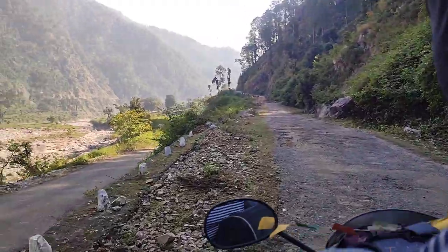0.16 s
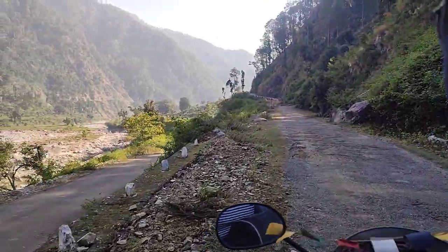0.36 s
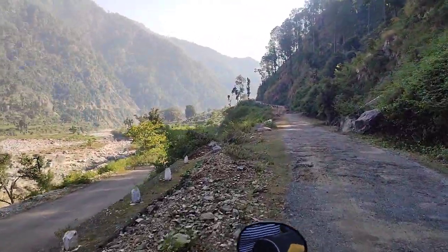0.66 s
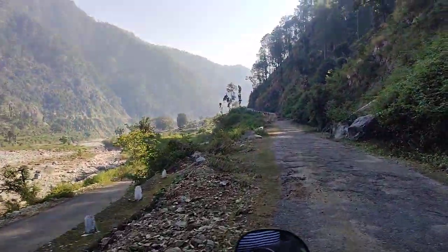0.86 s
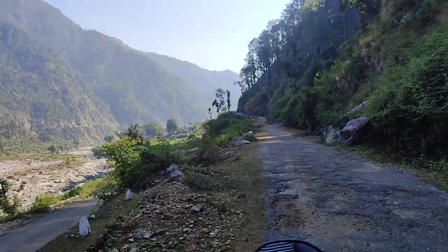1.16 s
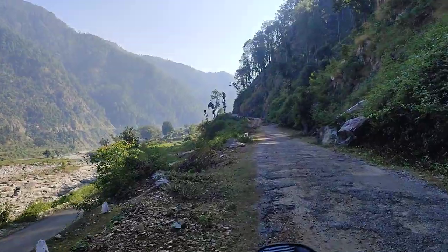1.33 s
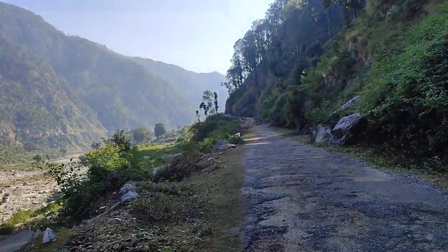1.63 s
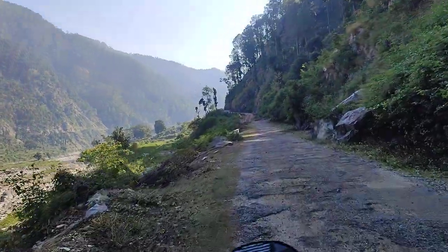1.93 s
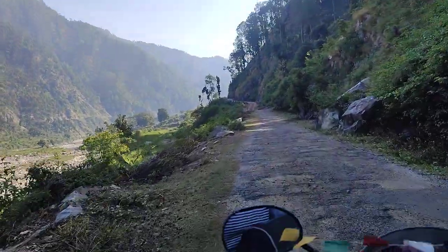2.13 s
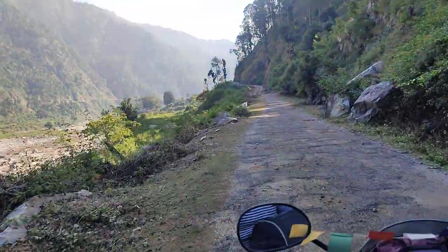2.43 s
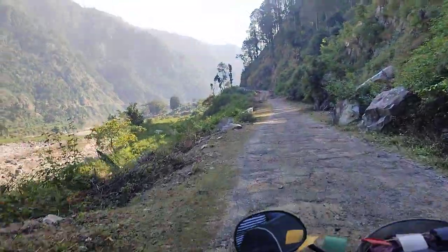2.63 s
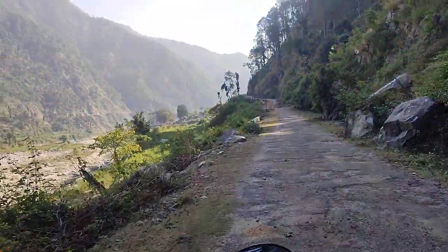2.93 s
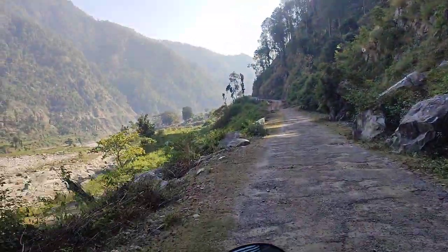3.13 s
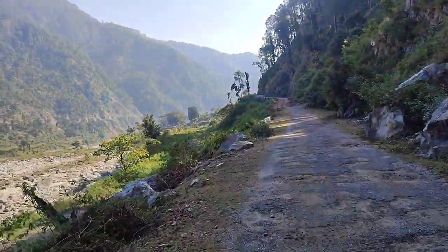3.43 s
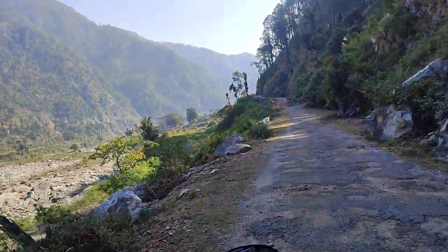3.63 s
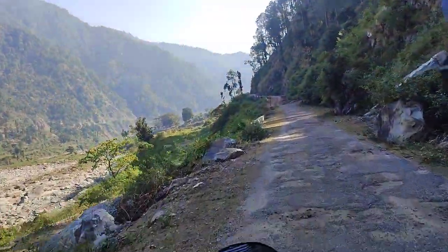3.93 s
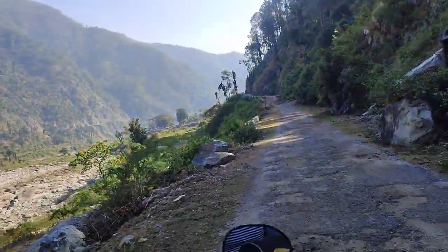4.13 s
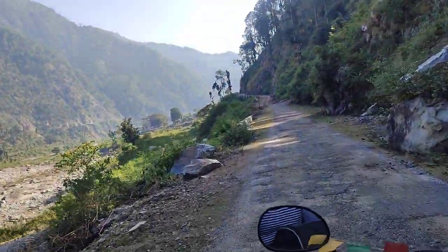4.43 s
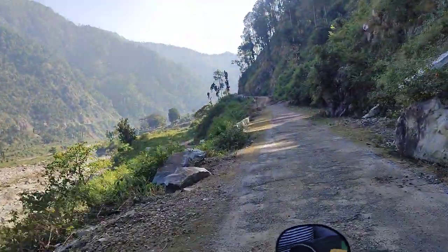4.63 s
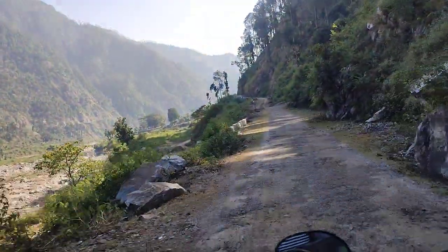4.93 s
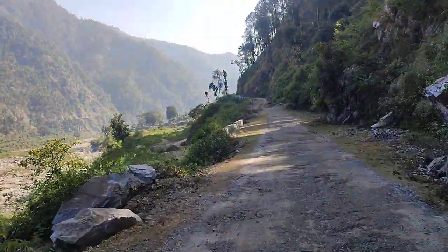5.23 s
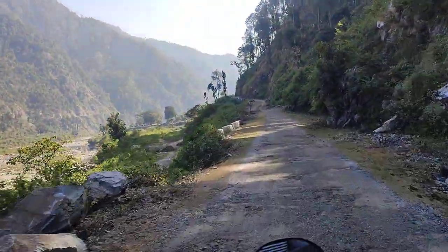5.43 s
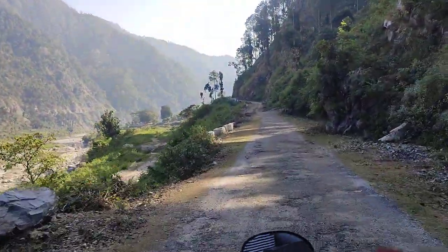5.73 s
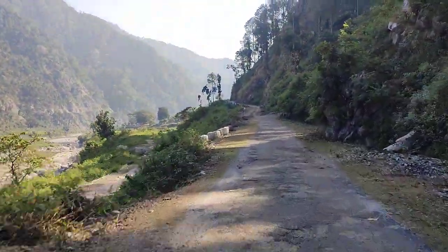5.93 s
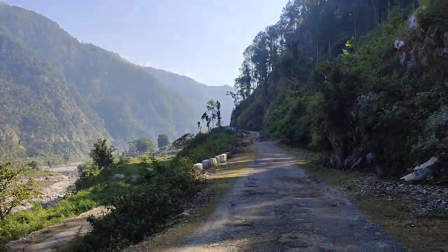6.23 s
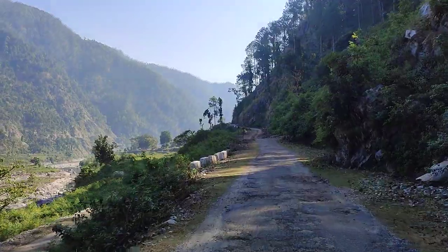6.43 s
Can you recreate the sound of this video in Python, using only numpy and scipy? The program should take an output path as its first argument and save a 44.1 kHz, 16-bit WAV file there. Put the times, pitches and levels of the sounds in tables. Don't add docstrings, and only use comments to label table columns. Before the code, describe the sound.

Wind thumps and flutters over a handheld microphone on a moving motorcycle. Beneath it a single-cylinder engine throbs and clatters, drops to a slow idle after a second, picks up again and climbs steadily, then eases off. Faint loose metal ticks on bumps and a thin hiss of tyres and air sit behind. Gusts start mostly on the left and later batter both sides.

```python
import sys
import numpy as np
from scipy import signal
from scipy.fft import rfft, irfft
from scipy.io import wavfile
from scipy.ndimage import uniform_filter1d, minimum_filter1d

SR = 44100
rng = np.random.default_rng(int(sys.argv[2]) if len(sys.argv) > 2 else 0)


def wav_record(signal):
    frames = np.transpose(np.atleast_2d(signal))
    bounded = np.clip(frames, -1, 1)
    quanta = np.round(bounded * 32767).astype(np.int16)
    wavfile.write(sys.argv[1], SR, quanta)


def field_ratio(decibels):
    return 10 ** (np.asarray(decibels, dtype=float) / 20)


N = 290530

# time_s, firings_per_s
ENGINE_SPEED = [(0, 34.5), (.15, 34.7), (.3, 35.4), (.47, 35.4), (.6, 35.9), (.72, 36.4), (.82, 36.0),
                (1.25, 23.0), (1.45, 17.2), (1.68, 17.0), (1.8, 21.0), (1.9, 25.5), (1.98, 29.6),
                (2.06, 30.1), (2.15, 29.2), (2.25, 28.2), (2.4, 27.75), (2.7, 27.6), (2.85, 27.0),
                (3.0, 26.4), (3.3, 27.7), (3.6, 29.5), (4.05, 31.3), (4.5, 33.4), (4.95, 36.0),
                (5.25, 36.8), (5.6, 38.9), (5.75, 39.0), (6.6, 33.0)]
# time_s, crank_boom_db, exhaust_bark_db
THROTTLE = [(0, -21, -31), (.55, -21, -31), (.72, -28, -32), (.82, -42, -40), (1.3, -48, -45),
            (1.68, -48, -41), (1.9, -36, -35), (2.0, -28, -31), (2.75, -27, -31), (3.0, -30, -33),
            (4.0, -24, -32), (5.4, -23, -30), (5.7, -29, -31), (5.85, -40, -40), (6.6, -46, -44)]
# pitch_hz, width_hz, level_db
EXHAUST_PIPE = [(140, 60, -4), (210, 50, -2), (283, 45, 1), (418, 50, 2), (590, 50, -16)]
# multiple_of_firing_rate, level_over_boom_db
CRANK_TONES = [(1, -21), (2, 0), (3, -20.5)]
# pitch_hz, width_hz, level_db
ENGINE_CASING = [(870, 80, -2), (1170, 110, 1), (1560, 220, 0), (2170, 100, 0), (3400, 160, -1),
                 (3800, 130, -2), (4450, 120, -3)]
# pitch_hz, level_db (per Hz)
CLATTER_COLOUR = [(420, -19), (620, 7.5), (1000, 2), (1650, -1.5), (1850, -5.5), (3000, -7), (4000, -40),
                  (5500, -31)]
# start_s, end_s, multiple_of_firing_rate, level_db, left_over_right_db
PANEL_BUZZES = [
    (-.2, .85, 44, -53, -2),
    (-.2, .8, 24.5, -45, 4),
    (1.95, 2.8, 28, -43, 4),
    (.15, .4, 65.5, -55, 2),
]
# time_s, rumble_db, flutter_db, rasp_db
WIND_LEFT = [(0.0, -44, -28.5, -34.5), (0.18, -24.5, -32.5, -40), (0.36, -12, -30, -35),
             (0.54, -22.5, -36, -41), (0.72, -18.5, -24.5, -30), (0.9, -20.5, -25.5, -38.5),
             (1.08, -22, -21, -32), (1.26, -31, -34, -41), (1.44, -27, -23.5, -43), (1.62, -11.5, -26, -47),
             (1.8, -14, -38, -39), (1.98, -18, -29, -39), (2.16, -18, -28.5, -35), (2.34, -21.5, -31, -43),
             (2.52, -25, -30.5, -40), (2.7, -13.5, -24.5, -36.5), (2.88, -24, -18.5, -30.5),
             (3.06, -17, -21.5, -36), (3.24, -14, -23, -33.5), (3.42, -18, -25, -30.5),
             (3.6, -31, -25, -46), (3.78, -10, -35, -42), (3.96, -21.5, -12, -22), (4.14, -11.5, -35, -47),
             (4.32, -14.5, -16.5, -26), (4.5, -12, -30, -34.5), (4.68, -9.5, -17, -24),
             (4.86, -29, -19, -20.5), (5.04, -50, -31, -24), (5.22, -15.5, -26.5, -19.5),
             (5.4, -19.5, -13, -21), (5.58, -17, -17, -20.5), (5.76, -16, -16, -25.5),
             (5.94, -30, -20, -18), (6.12, -19.5, -35, -23), (6.3, -35, -25.5, -23),
             (6.48, -23.5, -22.5, -23)]
WIND_RIGHT = [(0, -31, -37, -50), (.1, -30, -36, -50), (.3, -27, -35, -50), (.45, -31, -41, -52),
              (.72, -34, -41, -52), (.9, -31, -40, -48), (1.08, -24, -30, -48), (1.26, -32, -39, -50),
              (1.44, -33, -43, -52), (1.62, -43, -47, -54), (1.8, -36, -44, -54), (1.98, -37, -43, -52),
              (2.4, -35, -43, -52), (2.75, -34, -42, -52), (2.88, -33, -33, -48), (3.06, -23, -29, -46),
              (3.24, -21, -32, -46), (3.42, -32, -29, -44), (3.6, -22, -28, -40), (3.78, -15, -30, -44),
              (3.96, -24, -31, -42), (4.14, -24, -26, -42), (4.32, -20, -23, -31), (4.5, -19, -21, -31),
              (4.68, -20, -25, -38), (4.86, -25, -36, -38), (5.04, -13, -19, -33), (5.22, -21, -30, -37),
              (5.4, -22, -24, -38), (5.58, -19, -22, -38), (5.76, -26, -27, -40), (5.94, -18, -29, -39),
              (6.12, -17, -19, -24), (6.3, -17, -17, -16), (6.48, -24, -27, -39)]
# time_s, flutter_db, rasp_over_flutter_db, length_ms
BURSTS_LEFT = [(0.305, -17.5, -16, 17), (0.344, -19.5, -24, 68), (0.508, -12.5, -17, 30),
               (0.558, 1, -36, 5.3), (0.667, -9.5, -33, 16), (0.693, -8, -21, 9.7), (0.792, -6.5, -20, 14),
               (0.887, -8.5, -14.5, 8.3), (0.982, -12, -22, 26), (1.042, -16, -14, 66),
               (1.323, -22, -20, 140), (1.403, -16, -35, 10), (1.463, -15, -29, 10),
               (1.521, -16.5, -31, 16), (1.657, -40, -32, 19), (1.705, -36, -30, 16), (1.804, -18, -20, 16),
               (1.927, -19.5, -30, 72), (2.1, -26.5, -12, 35), (2.296, -21.5, -14, 50), (2.56, -18, -5, 7),
               (2.748, -13, -20, 25), (2.981, -12.5, -17, 36), (3.211, -15.5, -26, 17),
               (3.327, -13, -19, 38), (3.403, -4, -15.5, 8.6), (3.5, -14.5, -10.5, 91),
               (3.576, -3.5, -17, 6.5), (3.603, -1, -23, 5.7), (3.713, -19, -22, 14),
               (3.776, -16, -19, 5.3), (3.859, -11, -17, 11), (4.063, -13.5, -14.5, 33),
               (4.119, -7, -6.5, 5.5), (4.17, -10.5, -14.5, 47), (4.212, -12, -11, 17),
               (4.34, -13.5, -12.5, 33), (4.379, -12.5, -28, 15), (4.5, -13, -11.5, 55),
               (4.714, -17, -21, 26), (4.856, -4, -13, 17), (4.889, -32, -5, 24), (4.987, -17, -8, 24),
               (5.134, -11, -29, 26), (5.249, -15, -3, 9.2), (5.275, -13, -23, 18), (5.369, -14, -6, 15),
               (5.433, -14, -22, 15), (5.594, -15, -10, 56), (5.629, 9.5, -18.5, 8.2), (5.73, -9, -14, 10),
               (5.757, -15, -2.5, 14), (5.8, -20.5, 0, 68), (5.934, -8, -26, 11.7), (6.099, -20.5, -2, 22),
               (6.232, -16.5, -20, 28)]
BURSTS_RIGHT = [(0.292, -23, -22, 22), (1.004, -25, -21, 24), (1.086, -35, -16, 28), (1.16, -20, -20, 22),
                (2.894, -34, -6, 48), (3.032, -26, -26, 35), (3.186, -15.5, -25, 15), (3.268, -27, -11, 19),
                (3.305, -37, -16, 16), (3.52, -35, -12, 18), (3.555, -25, -13, 19), (3.657, -23, -13, 16),
                (3.72, -16, -15, 15), (3.753, -10, -14, 13.6), (3.794, -20.5, -13, 19),
                (3.884, -19, -16, 11), (3.97, -22, -2, 19), (4.113, -24, -7, 15), (4.147, -24, -8, 16),
                (4.195, -18, -17, 17), (4.259, -17.5, -16, 50), (4.347, -25, -3, 17), (4.432, -20, -6, 14),
                (4.477, -18.5, -13, 22), (4.564, -26, -3, 15), (4.676, -27, -3, 40), (4.905, -20, -18, 11),
                (4.986, -18, -31, 13), (5.015, -8.5, -26, 18), (5.052, -11.5, -16, 13),
                (5.104, -9, -14, 9.3), (5.136, -7.5, -25, 13), (5.17, -32, -18, 10.6),
                (5.233, -12.5, -20, 28), (5.282, -16, -27, 24), (5.324, -22, -19, 11),
                (5.392, -38, -22, 25), (5.45, -23, -9, 20), (5.5, -33, -9, 20), (5.534, -20, -9, 13),
                (5.679, -11, -21, 17), (5.77, -19, -12, 49), (5.877, -44, -19, 16), (5.92, -29, -23, 18),
                (6.002, -8, -23, 5), (6.035, -10, -11.5, 60), (6.1, -11.5, -9.5, 28), (6.195, -16, -3, 34),
                (6.28, -10.5, -15, 40), (6.409, -23, -5, 21), (6.448, -12.5, -7, 23), (6.549, -8, -8, 32)]
# time_s, peak_db, crackle_over_peak_db
WHIRLS_LEFT = [
    (0.667, -11, -30),
    (4.76, -9.5, -33),
    (4.815, -4, -28),
    (5.729, -13, -28),
]
WHIRLS_RIGHT = [
    (3.719, -10, -29),
    (4.474, -17, -27),
    (6.005, -13, -35),
    (6.193, -13, -17),
    (6.217, -6, -9),
    (6.411, -7, -19),
    (6.55, -7, -7),
]
# time_s, peak_db, left_over_right_db
METAL_TICKS = [
    (1.6182, -47.5, -14),
    (3.258, -37.5, 5),
    (3.4894, -46, 15),
    (3.69, -36, 2.0),
    (3.914, -45, 5),
    (5.4085, -37.5, -6),
    (5.6017, -43, 16),
]
# pitch_hz, level_db, ring_time_s (to fall 60 dB)
METAL_RING = [(3750, -3, 0.062), (5800, -6, 0.024), (6830, 0.5, 0.032), (7880, 0, 0.015),
              (8400, -1.5, 0.087), (11500, -20, .03), (13900, -32, 0.033)]
# time_s, left_hiss_db, right_hiss_db, engine_clatter_db
RUSH_LEVELS = [(0.0, -50, -47, -46.5), (0.2, -48, -47, -45), (0.4, -42.5, -42, -44.5),
               (0.6, -50.5, -45.5, -47), (0.8, -49.5, -47.5, -48.5), (1.0, -52, -51.5, -53),
               (1.2, -52.5, -53, -51.5), (1.4, -55.5, -55.5, -53), (1.6, -56.5, -55.5, -54.5),
               (1.8, -53.5, -52.5, -52), (2.0, -51, -52, -47.5), (2.2, -48, -49.5, -44),
               (2.4, -50, -48.5, -46), (2.6, -50.5, -47.5, -46), (2.8, -50, -48.5, -49),
               (3.0, -49, -47, -46.5), (3.2, -49, -47, -45.5), (3.4, -49, -46, -49),
               (3.6, -49, -45.5, -47.5), (3.8, -49.5, -47, -45.5), (4.0, -49.5, -47, -47.5),
               (4.2, -50, -45, -46), (4.4, -48.5, -44, -47), (4.6, -50, -45.5, -45), (4.8, -51, -46, -48),
               (5.0, -46.5, -44, -46.5), (5.2, -49.5, -45.5, -47.5), (5.4, -44.5, -46.5, -46.5),
               (5.6, -50.5, -43.5, -45), (5.8, -52.5, -46.5, -46), (6.0, -48, -46.5, -44.5),
               (6.2, -50, -60, -50.5), (6.4, -50, -56, -50)]
# pitch_hz, level_db (per Hz)
HISS_COLOUR = [(2060, -1), (3500, 2), (5760, -7.5), (7020, -5), (8770, -8.5), (9630, -15.5), (10700, -15.5),
               (12300, -14), (14200, -16.5)]
# time_s, level_db
RIGHT_GAIN = [
    (5.1, -2.5),
    (5.18, -9),
    (5.26, 0),
    (6.03, -3),
    (6.1, -15),
    (6.3, -2),
    (6.48, -18),
    (6.6, 12),
]


def engine(clatter_db):
    (firings_per_s,), (boom_db, bark_db) = in_time(ENGINE_SPEED), in_time(THROTTLE)
    cycles = np.cumsum(firings_per_s) / SR + .3
    beat = 1 + 0.67 * np.exp(-(cycles % 1) * 2.6)
    bark = field_ratio(bark_db) * exhaust(cycles, firings_per_s)
    boom = np.zeros(N)
    for multiple, db in CRANK_TONES:
        boom += field_ratio(boom_db + db + 4) * np.cos(2 * np.pi * multiple * cycles + 1.12 * multiple)
    noise = coloured(CLATTER_COLOUR)
    ringing = resonate(noise[::-1], ENGINE_CASING)
    clatter = rms_one(noise + field_ratio(2.0) * ringing) * beat * field_ratio(drift(15.0))
    out = boom * field_ratio([[-1.0], [1.0]]) + bark * field_ratio([[-1.0], [2.5]])
    out += field_ratio(clatter_db + 5.5) * pair(*clatter, alike=0.84)
    return out + panel_buzz(cycles, beat)


def exhaust(cycles, firings_per_s):
    half_cycles = np.floor(2 * cycles)
    puff_now = np.diff(half_cycles, prepend=0) > 0
    second = np.clip((firings_per_s - 29) * .05, 0, .9)
    strength = np.where(half_cycles % 2, second, 1) * field_ratio(.7 * rng.standard_normal(N))
    puffs = puff_now * strength / np.sqrt(firings_per_s * (1 + second ** 2))
    return rms_one(low_pass(resonate(puffs, EXHAUST_PIPE), 503, order=3))


def panel_buzz(cycles, beat):
    out = np.zeros((2, N))
    for start, end, multiple, db, pan_db in PANEL_BUZZES:
        progress = np.clip((np.arange(N) / SR - start) / (end - start), 0, 1)
        swell = np.sin(np.pi * progress) ** .5
        tone = np.sin(2 * np.pi * multiple * cycles + .6 * drift(25.0))
        rough = field_ratio(2.5 * drift(30.0)) * tone
        out += swell * beat * rough * field_ratio([[db + pan_db / 2], [db - pan_db / 2]])
    return out


def port_wind(flow, bursts, whirls):
    rumble_db, flutter_db, rasp_db = in_time(flow)
    lumps = drift(29.8)
    flutter_power = field_ratio(flutter_db + 3.7 * lumps) ** 2
    rasp_power = field_ratio(rasp_db - 3 + 1.45 * lumps + 3.6 * drift(76.0)) ** 2
    add_bursts(flutter_power, rasp_power, bursts)
    white = rng.standard_normal((2, N))
    rumble = noise_band(white[1], 14.4, 114, even=0.32, order=2) * field_ratio(rumble_db + 2.0 * lumps)
    flutter = noise_band(white[0], 95, 400, even=.5, order=4) * np.sqrt(flutter_power)
    rasp = noise_band(white[0], 377, 667, even=0.1, order=2) * np.sqrt(rasp_power) * field_ratio(4.0 * drift(200.0))
    crackle = noise_band(white[0], 1500, 2800, even=0, order=3)
    crackle = crackle * rasp_power * field_ratio(-6.5 + 3.4 * drift(200.0))
    return rumble + flutter + rasp + crackle + whirl_slaps(whirls, white[1])


def add_bursts(flutter_power, rasp_power, bursts):
    for s, db, rasp_over_db, length_ms in bursts:
        reach_s = length_ms / 600
        first, last = max(round((s - reach_s) * SR), 0), min(round((s + reach_s) * SR), N)
        span = np.arange(first, last)
        ahead = (span / SR - s) * 1000 / length_ms
        shape = np.exp(-(np.where(ahead < 0, 2.6, 1.9) * ahead) ** 2)
        flutter_power[span] += field_ratio(db) ** 2 * shape
        rasp_power[span] += field_ratio(db + rasp_over_db) ** 2 * shape


def whirl_slaps(whirls, white):
    hits, cracks = np.zeros((2, N))
    for s, db, crackle_db in whirls:
        at = round(s * SR)
        hits[at], cracks[at] = -field_ratio(db), field_ratio(db + crackle_db)
    thump = 26 * low_pass(resonate(hits, [(670, 200, 0)]), 1300, order=4)
    tear = np.convolve(cracks, np.exp(-np.arange(300) / 70))[:N] * white
    return thump + 3.0 * low_pass(band(tear, 900, 6300), 2800, order=3)


def ticks():
    out = np.zeros((2, N))
    length = 3000
    fade = np.exp(-np.arange(length) / (0.015 * SR))
    modes = [(hz, np.log(1000) / np.pi / ring_s, db) for hz, db, ring_s in METAL_RING]
    for s, db, pan_db in METAL_TICKS:
        draw = rng.standard_normal(length)
        touches = draw * fade * (np.abs(draw) > 1.5)
        sound = resonate(touches, modes) + 0.26 * band(touches, 4400, 14000)
        at = round(s * SR)
        level = field_ratio(db + pan_db / 2 * np.array([[1], [-1]]))
        out[:, at:at + length] += sound / np.abs(sound).max() * level
    return out


def rush(left_db, right_db):
    flicker_db = np.array([drift(9.0), drift(9.0)]) + .8 * drift(25.0)
    return coloured(HISS_COLOUR) * field_ratio(np.array([left_db, right_db]) + 0.5 + flicker_db)


def rms_one(x):
    return x / np.sqrt(np.mean(x ** 2) + 1e-20)


def in_time(rows):
    s, *columns = np.transpose(rows)
    return [np.interp(np.arange(N) / SR, s, c) for c in columns]


def drift(rate_hz):
    r = np.exp(-2 * np.pi * rate_hz * 40 / SR)
    draws = rng.standard_normal(N // 40 + 2002)
    slow = signal.lfilter([1], [1, -2 * r, r * r], draws)[2000:]
    return np.interp(np.arange(N) / 40, np.arange(len(slow)), rms_one(slow))


def band(x, low_hz, high_hz, order=2):
    return signal.sosfilt(signal.butter(order, [low_hz, high_hz], "band", fs=SR, output="sos"), x)


def low_pass(x, hz, order):
    return signal.sosfilt(signal.butter(order, hz, fs=SR, output="sos"), x)


def noise_band(x, low_hz, high_hz, even, order):
    x = low_pass(band(x, low_hz, 2 * high_hz), high_hz, order)
    power = uniform_filter1d(x * x, size=round(3 * SR / low_hz))
    return rms_one(x / power ** (even / 2))


def resonate(x, modes):
    out = 0
    for k, (hz, width_hz, db) in enumerate(modes):
        r = np.exp(-np.pi * width_hz / SR)
        poles = [1, -2 * r * np.cos(2 * np.pi * hz / SR), r * r]
        ring = signal.lfilter([1 - r * r, 0, r * r - 1], poles, x + 1e-18)
        out = out + (-1) ** k * field_ratio(db) * ring
    return out


def coloured(spectrum):
    hz = np.maximum(np.fft.rfftfreq(N, 1 / SR), 1)
    points = np.array(spectrum)
    gain_db = np.interp(np.log(hz), np.log(points[:, 0]), points[:, 1], left=-80, right=-80)
    return rms_one(irfft(rfft(rng.standard_normal((2, N))) * field_ratio(gain_db), N))


def pair(mid, side, alike):
    return np.sqrt(alike) * mid + np.sqrt(1 - alike) * side * [[1], [-1]]


def scene():
    left_db, right_db, clatter_db = in_time(RUSH_LEVELS)
    wind_left = port_wind(WIND_LEFT, BURSTS_LEFT, WHIRLS_LEFT)
    wind_right = port_wind(WIND_RIGHT, BURSTS_RIGHT, WHIRLS_RIGHT)
    gain = field_ratio([np.zeros(N), *in_time(RIGHT_GAIN)])
    ride = engine(clatter_db) + ticks() + rush(left_db, right_db)
    return ride * gain + np.array([wind_left, wind_right])


def roll_off(x):
    return signal.sosfilt(signal.butter(12, 14320, fs=SR, output="sos"), x)


def record(dry):
    needed = np.minimum(1, .87 / (np.abs(dry) + 1e-9))
    held = minimum_filter1d(needed, size=401, axis=1)
    gain = uniform_filter1d(held, size=201, axis=1)
    return roll_off(dry * gain)


dry = scene()
out = record(dry)
wav_record(out)
```